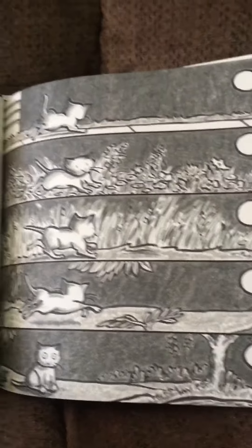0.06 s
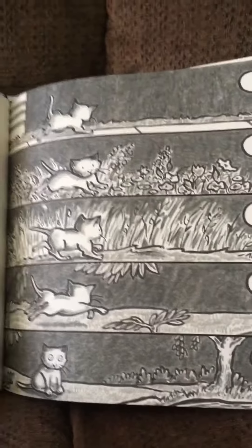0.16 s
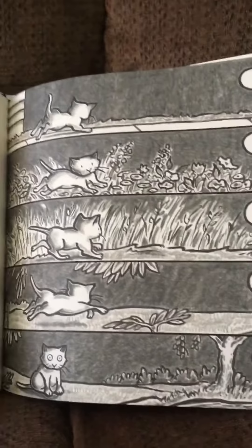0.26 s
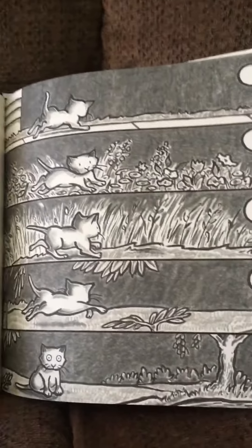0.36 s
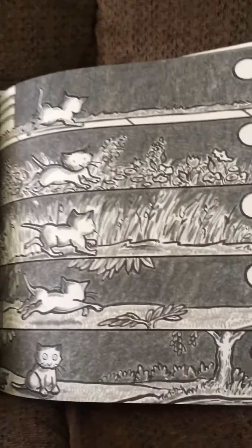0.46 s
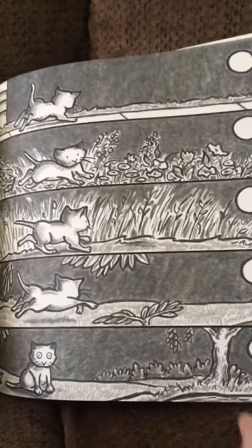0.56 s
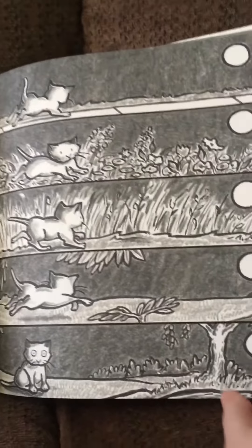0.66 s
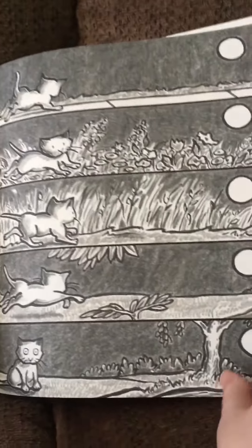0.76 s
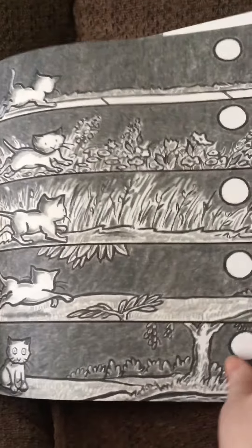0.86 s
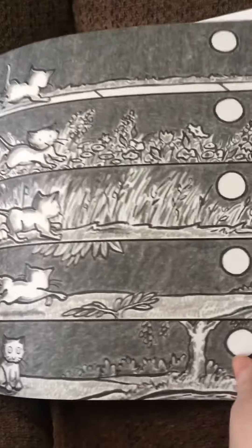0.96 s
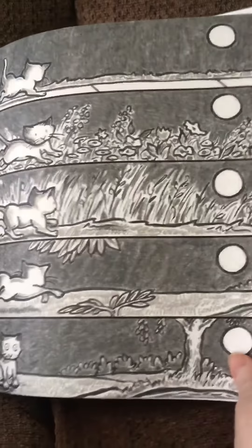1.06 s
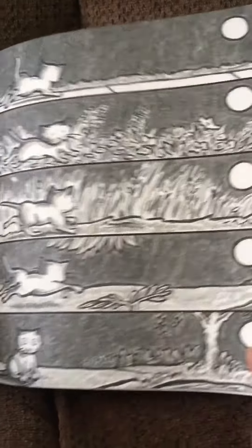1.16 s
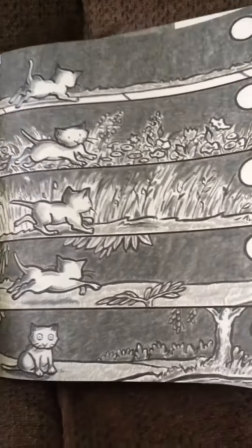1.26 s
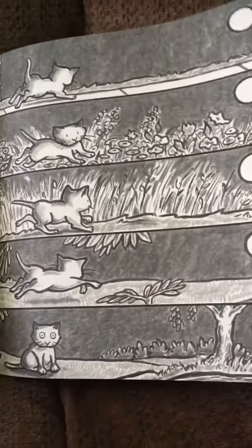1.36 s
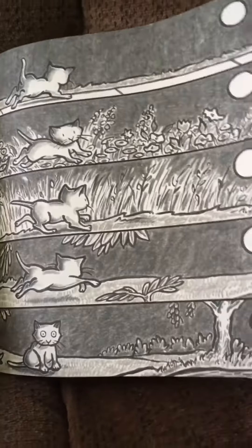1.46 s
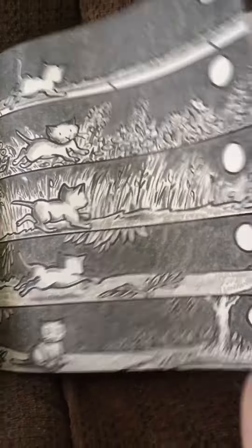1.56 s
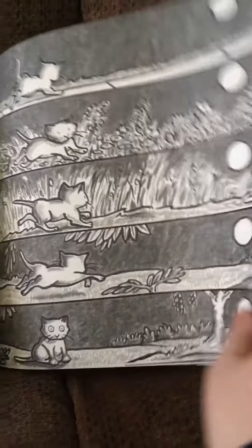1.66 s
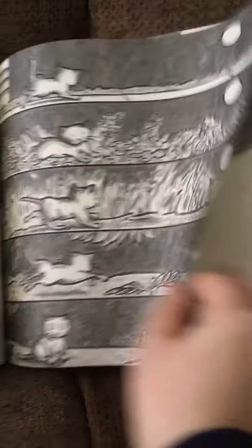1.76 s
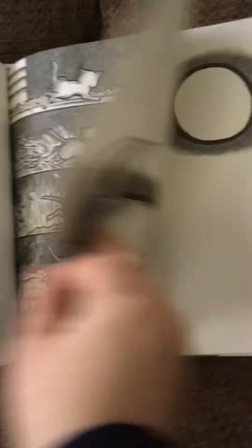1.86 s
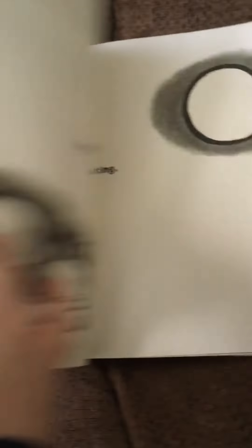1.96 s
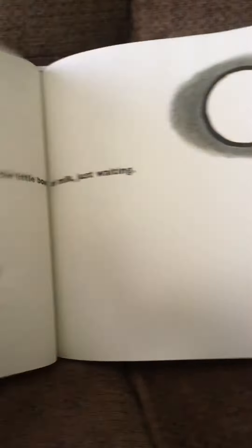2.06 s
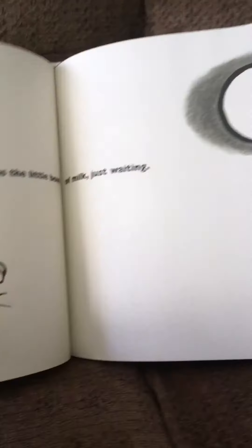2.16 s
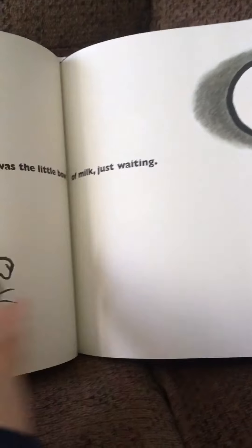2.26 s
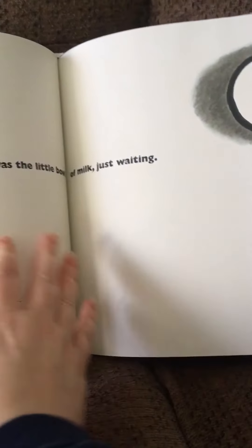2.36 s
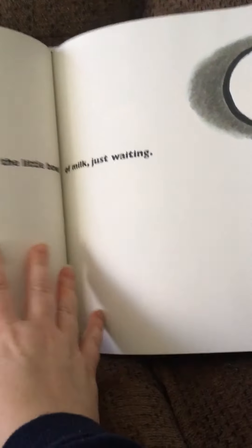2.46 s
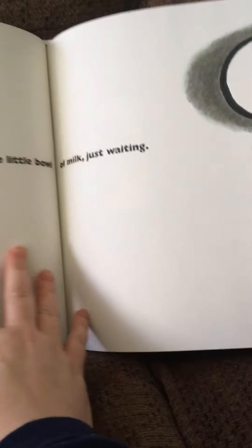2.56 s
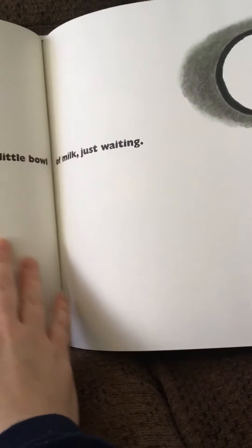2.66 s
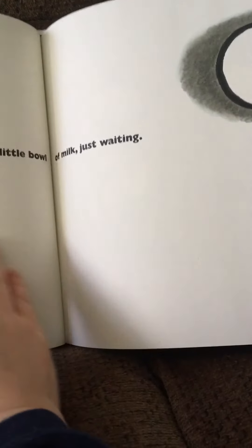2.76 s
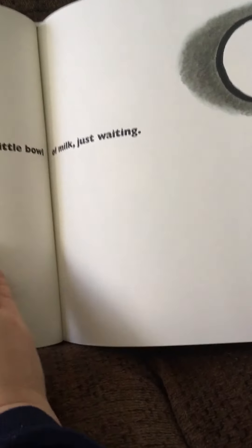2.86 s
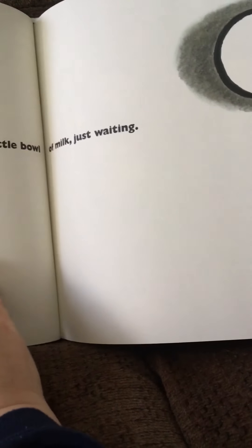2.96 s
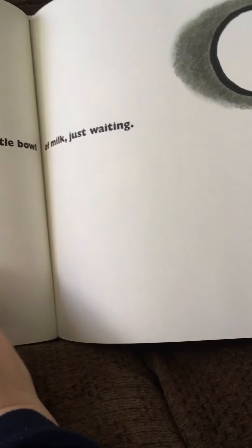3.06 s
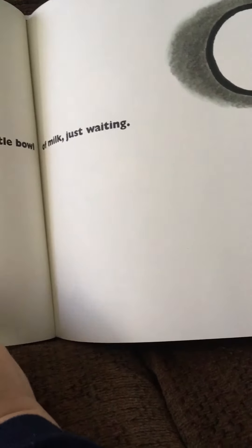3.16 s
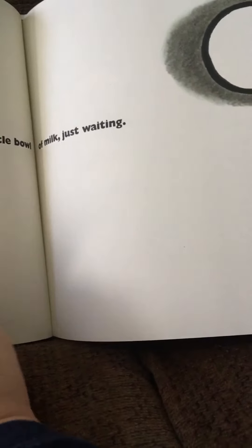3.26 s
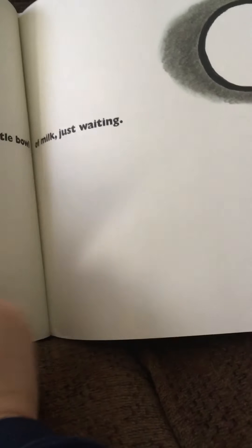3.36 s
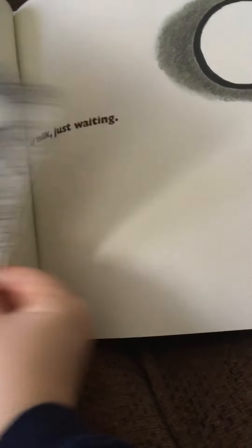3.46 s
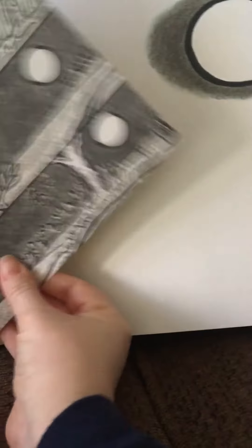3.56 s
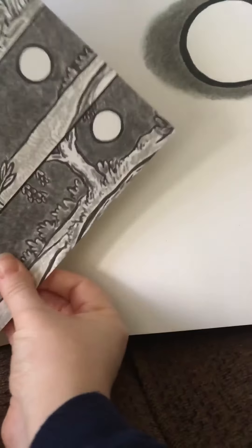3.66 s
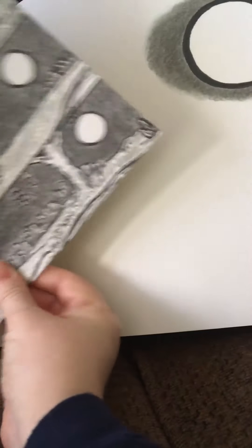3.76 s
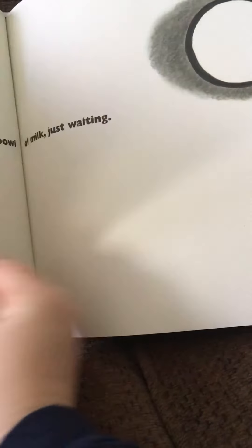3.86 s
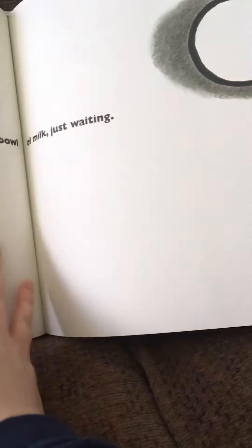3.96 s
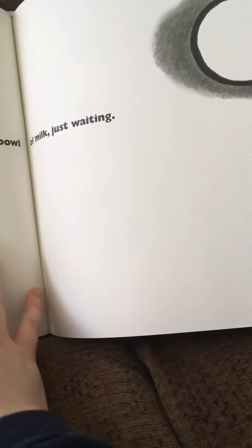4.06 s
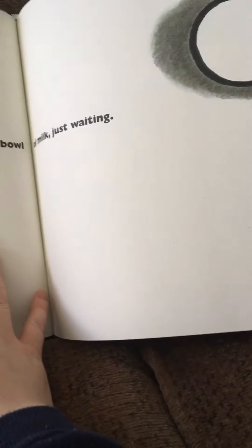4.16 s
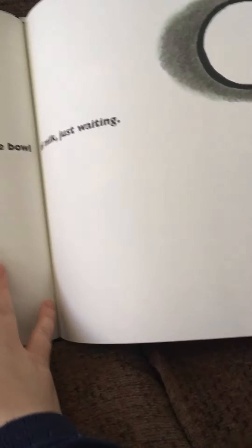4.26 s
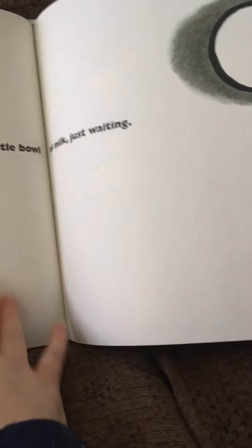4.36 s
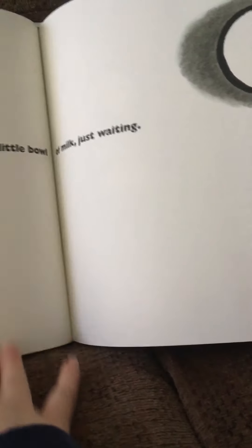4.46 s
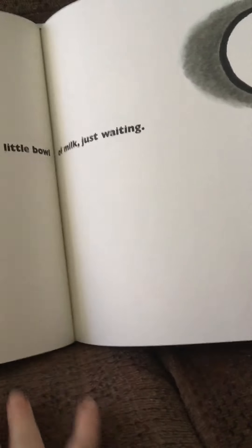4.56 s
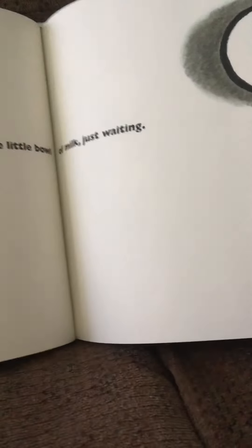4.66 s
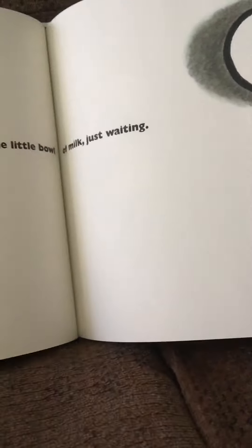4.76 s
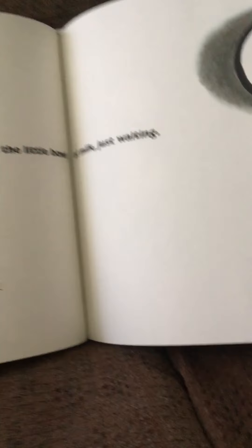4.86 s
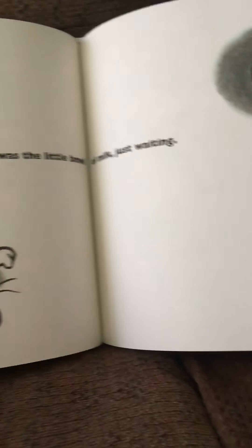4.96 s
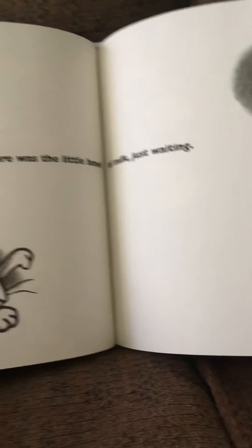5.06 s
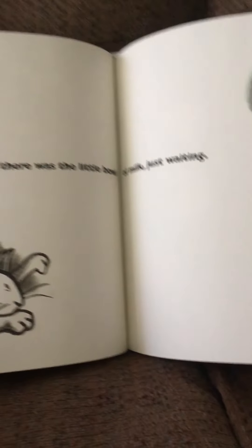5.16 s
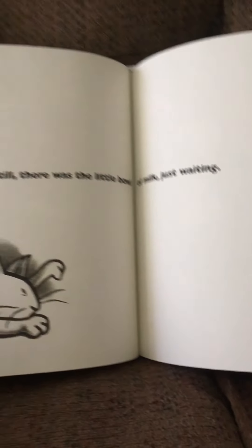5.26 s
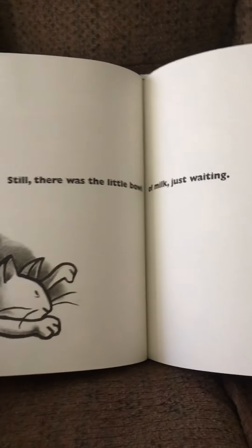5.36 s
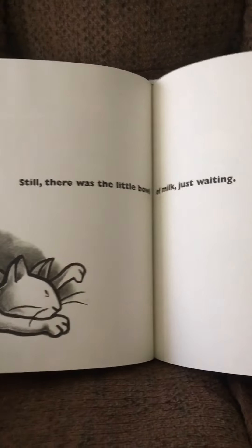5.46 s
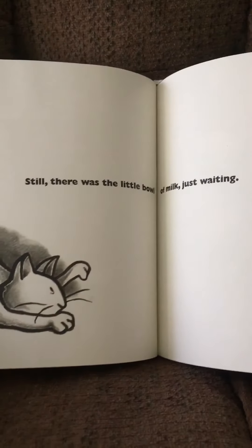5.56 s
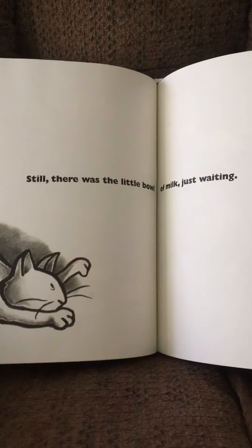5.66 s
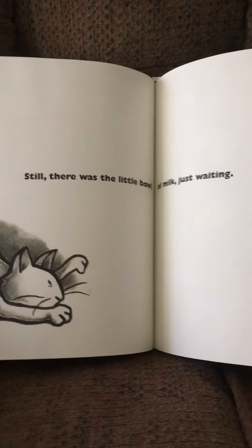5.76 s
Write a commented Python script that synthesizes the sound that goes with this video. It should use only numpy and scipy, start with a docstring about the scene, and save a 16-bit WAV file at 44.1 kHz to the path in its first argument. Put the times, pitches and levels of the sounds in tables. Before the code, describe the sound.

A stiff book page is turned by hand, with paper sliding, crackling and flapping close by in a quiet room.

```python
"""A hand turns a stiff page of a picture book on a sofa, close to a microphone in a quiet room.
From 0.4 s fingers slide over the paper, its fibres catching in a hiss and rasp. From 0.8 s the sheet
buckles in sharp snaps and its edge scrapes. Near 2.1 s it flaps over, thudding the book into the cushion.
After more strokes it is lifted again and crackles from 3.3 to 4 s; last, it is smoothed flat until 5.5 s."""
import sys
import numpy as np
from scipy import signal
from scipy.fft import rfft, irfft
from scipy.io import wavfile
from scipy.ndimage import uniform_filter1d

SR = 44100
rng = np.random.default_rng(int(sys.argv[2]) if len(sys.argv) > 2 else 0)


def store_pcm(level_fs):
    """Save levels as 16-bit WAV."""
    pcm = np.round(np.clip(level_fs, -1, 1) * 32767).astype(np.int16)
    wavfile.write(sys.argv[1], SR, np.atleast_2d(pcm).T)


N = 256509


def amp(db):
    """Decibels to gain."""
    return 10 ** (np.asarray(db) / 20)


def unit(x):
    """Scales to rms 1."""
    return x / np.sqrt(np.mean(x ** 2) + 1e-20)


def read(points, hz):
    """Interpolates a curve over log frequency."""
    f, value = np.transpose(points)
    return np.interp(np.log(hz + 1), np.log(f + 1), value)


def add(mix, start_s, sound):
    """Mixes a sound in at start_s."""
    part = mix[max(round(start_s * SR), 0):][:len(sound)]
    part += sound[:len(part)]


def colour(x, points, size=2048):
    """Minimum-phase filter from (f/Hz, level/dB) points; attacks stay sharp."""
    log_gain = np.log(amp(read(points, abs(np.fft.fftfreq(size, 1 / SR)))))
    taps = np.fft.ifft(np.exp(np.conj(signal.hilbert(log_gain)))).real[:size // 2]
    return signal.fftconvolve(x, taps)[:len(x)]


def narrow_noise(start_hz, end_hz, length_s, rel_width):
    """Noise through one gliding resonance."""
    centre_hz = np.geomspace(start_hz, end_hz, max(round(length_s * SR), 256))
    offset = 2 * np.fft.fftfreq(SR, 1 / SR) / (rel_width * centre_hz.mean())
    noise = rng.standard_normal(SR) + 1j * rng.standard_normal(SR)
    waver = np.fft.ifft(np.fft.fft(noise) / (1 + offset ** 2))
    return (waver[:len(centre_hz)] * np.exp(2j * np.pi * np.cumsum(centre_hz) / SR)).real


def burst(sound, length_s, rms_db, rise, fall):
    """Cuts a burst from a steady sound; rise and fall are shares of its length."""
    u = np.linspace(0, 1, int(np.clip(length_s * SR, 200, len(sound))))
    envelope = np.clip(np.minimum(u / rise, (1 - u) / fall), 0, 1)
    return amp(rms_db) * unit(sound[:len(u)] * envelope)


def friction(per_s, spread_db, smooth):
    """Fibres catch and let go: tiny uneven clicks over a smooth hiss."""
    sizes = amp(spread_db * np.minimum(rng.exponential(1, N), 5)) * rng.choice([-1, 1], N)
    clicks = unit(sizes * (rng.random(N) < per_s / SR))
    return unit(clicks + smooth * rng.standard_normal(N))


# background spectrum: f/Hz, relative level/dB
FLOOR_SPECTRUM = [(15, -53.5), (28, -26.5), (45, -1.5), (70, -4.5), (95, -13), (135, -20.5), (215, -18),
                  (280, -25), (400, -26.5), (520, -32.5), (1100, -35), (2200, -40), (5000, -44),
                  (15500, -38)]

def noise_floor(rms_db=-59.5):
    """Low room rumble and faint microphone hiss."""
    gain = amp(read(FLOOR_SPECTRUM, np.fft.rfftfreq(N, 1 / SR)))
    return amp(rms_db) * unit(irfft(rfft(rng.standard_normal(N)) * gain, N))


# near surfaces, open page first: delay/s, gain
REFLECTIONS = [(.0016, 0.11), (.0033, 0.057), (.0047, -0.059), (.0098, 0.16), (0.0122, -0.18),
               (0.0129, 0.036), (.0185, -0.016)]
# room decay: f/Hz, t60/s
ROOM_T60 = [(100, 0.34), (500, 0.37), (1500, 0.27), (5000, 0.22), (15000, 0.22)]

def room(x, wet_db):
    """Near reflections, then a short tail dulled by furniture."""
    near = x.copy()
    reflected = colour(x, [(1500, -5), (4000, -5), (14000, -10.5)])
    for delay_s, gain in REFLECTIONS:
        add(near, delay_s, gain * reflected)
    hz, t, noise = signal.stft(rng.standard_normal(SR // 2), SR, nperseg=256)
    tail = signal.istft(noise * amp(-60 * t / read(ROOM_T60, hz)[:, None]), SR, nperseg=256)[1]
    tail *= np.clip((np.arange(len(tail)) / SR - 0.005) / 0.015, 0, 1)
    tail = colour(tail / np.linalg.norm(tail), [(100, 4), (1500, -4.5), (4000, -6), (14000, -8.5)])
    return near + amp(wet_db) * signal.fftconvolve(x, tail)[:N]


# sheet sways: start t/s, end t/s, level/dB, f/Hz
SHEET_SWAYS = [(1.55, 1.72, -58.5, 100), (2.092, 2.17, -43.5, 84.8), (2.181, 2.74, -62.5, 354.3),
               (3.111, 3.21, -61.5, 348), (3.455, 3.68, -50, 90.8), (3.785, 4.02, -53.5, 87.9)]

def sways():
    """The bowed sheet wobbles in one low, loose mode and settles."""
    out = np.zeros(N)
    for start, end, db, hz in SHEET_SWAYS:
        mode = narrow_noise(hz, hz, end - start, rel_width=0.75)
        add(out, start, burst(mode, end - start, db, rise=0.084, fall=0.63))
    return out


def air_push(db, hz):
    """The broad sheet pushes air: a few low cycles that sag in pitch on the cushion."""
    t = np.arange(4096) / SR
    cycles = hz * np.cumsum(0.688 + 0.55 * np.exp(-t / 0.013)) / SR
    spectrum = [(30, -15), (hz / 2, 0), (hz * 1.6, -1), (hz * 2, -11), (hz * 5, -40), (4000, -75)]
    wobble = unit(colour(rng.standard_normal(len(t)), spectrum))
    envelope = (1 - np.exp(-t / 0.0036)) * np.exp(-t / 0.0098)
    return amp(db) * (np.sin(2 * np.pi * cycles) + 0.93 * wobble) * envelope


# cushion thuds: t/s, level/dB, nominal f/Hz
BOOK_BUMPS = [(0.524, -38, 80), (0.657, -41.5, 156), (.782, -36, 199), (1.296, -46, 171), (1.511, -36, 297),
              (1.554, -37, 109), (1.974, -40.5, 205), (2.097, -31.5, 201), (2.143, -28.5, 201),
              (3.327, -30.5, 231), (3.561, -35, 163), (3.774, -38, 179), (3.804, -36, 151),
              (3.954, -34.5, 162), (4.038, -46.5, 155), (4.073, -45, 148), (4.206, -51, 141)]

def bumps():
    """Hand and falling page press the book into the cushion with soft thuds."""
    out = np.zeros(N)
    for start, db, hz in BOOK_BUMPS:
        add(out, start, air_push(db, hz))
    return out


# fingertip or page edge skating: start t/s, end t/s, level/dB, start f/Hz, end f/Hz
CONTACT_SWISHES = [(0.875, .937, -60, 4400, 4400), (0.961, 1.017, -64, 4710, 4700),
                   (1.203, 1.5, -55, 4120, 3460), (1.225, 1.31, -51.5, 8750, 4970),
                   (1.818, 1.888, -59.5, 4070, 4140), (2.273, 2.375, -58, 4380, 4200),
                   (2.406, 2.457, -56, 4420, 4410), (2.65, 2.805, -66, 3910, 3900)]

def swishes():
    """Friction excites a bright contact resonance, which sinks where the gap under the page opens."""
    out = np.zeros(N)
    for start, end, db, start_hz, end_hz in CONTACT_SWISHES:
        resonance = narrow_noise(start_hz, end_hz, end - start, rel_width=0.13)
        add(out, start, burst(resonance, end - start, db, rise=0.03, fall=0.56))
    return out


# edge friction: f/Hz, relative level/dB
SCRAPE_SPECTRUM = [(200, -1), (900, -8.5), (2000, 1), (4000, 2.5), (6500, 0.5), (10000, 2), (16000, -5)]
# edge drags over the next page: start t/s, end t/s, level/dB
EDGE_SCRAPES = [(0.984, 1.013, -51), (1.296, 1.313, -40), (1.38, 1.392, -45), (1.85, 1.868, -51.5),
                (2.077, 2.143, -46), (2.201, 2.235, -40.5), (3.608, 3.656, -48), (3.898, 3.912, -42.5),
                (3.94, 3.96, -37.5)]

def scrapes():
    """The cut edge skids in bright, grainy bursts that stop short as it slips free."""
    out = np.zeros(N)
    grain = colour(friction(per_s=5000, spread_db=2.5, smooth=1), SCRAPE_SPECTRUM)
    for start, end, db in EDGE_SCRAPES:
        add(out, start, burst(grain[round(start * SR):], end - start, db, rise=0.17, fall=0.049))
    return out


# flutter spectrum: f/centre, relative level/dB
FLAP_SPECTRUM = [(.1, -21.5), (.35, -13.5), (.6, -6.5), (.8, -7), (1.12, -1), (1.45, -13.5), (2.1, -20),
                 (4, -47), (12, -36)]
# loose sheet flexing: start t/s, end t/s, level/dB, centre f/Hz
SHEET_FLAPS = [(0.782, 0.806, -47, 670), (0.818, .827, -44, 690), (0.982, 1.023, -53, 790),
               (1.294, 1.315, -50, 610), (1.568, 1.578, -46.5, 1550), (2.006, 2.038, -55.5, 1080),
               (2.083, 2.117, -31, 1300), (2.142, 2.17, -38, 960), (2.16, 2.212, -39, 1230),
               (3.87, 3.928, -39.5, 1270), (3.95, 3.985, -45, 1040), (4.205, 4.227, -63, 636)]

def flaps():
    """A run of soft buckles in the flexing sheet gives a hollow flutter."""
    out = np.zeros(N)
    buckles = friction(per_s=2500, spread_db=0.9, smooth=0.81)
    for start, end, db, hz in SHEET_FLAPS:
        spectrum = [(ratio * hz, level) for ratio, level in FLAP_SPECTRUM]
        flutter = colour(buckles[round(start * SR):][:SR // 4], spectrum)
        add(out, start, burst(flutter, end - start, db, rise=0.12, fall=0.56))
    return out


def bending(x, depth_db, patch_hz, patch_s, size=512):
    """The bending sheet favours shifting bands from moment to moment."""
    frames = dict(nperseg=size, noverlap=size * 3 // 4)
    bands = signal.stft(x, **frames)[2]
    patch_bins = max(round(patch_hz * size / SR), 1)
    patch_frames = max(round(patch_s * SR * bands.shape[1] / len(x)), 1)
    field = uniform_filter1d(rng.standard_normal(bands.shape), patch_bins, axis=0)
    field = unit(uniform_filter1d(field, patch_frames, axis=1))
    return signal.istft(bands * amp(depth_db * field), **frames)[1][:len(x)]


def hand_speed(start, fastest, end):
    """A stroke speeds up and slows to rest in one smooth arch."""
    progress = np.interp(np.arange(N) / SR, [start, fastest, end], [0, 0.5, 1])
    return np.maximum(np.sin(np.pi * progress), 0)


# light touch: f/Hz, relative level/dB
HISS_SPECTRUM = [(300, -20), (1500, -29.5), (4000, -19), (6500, -1.5), (9000, 0), (13000, 3.5),
                 (16000, -0.5)]
# firm contact: f/Hz, relative level/dB
RASP_SPECTRUM = [(100, -24), (300, -17.5), (520, -20), (750, -8), (1000, -1.5), (1600, -0.5), (2600, -3.5),
                 (4200, -3.5), (6500, -7.5), (10000, -8.5), (16000, -25)]
# palm: f/Hz, relative level/dB
RUB_SPECTRUM = [(80, -7.5), (230, 2.5), (520, -7), (800, 1.5), (1200, -7.5), (2200, -20.5), (6000, -23.5)]
# hand and page over paper: start t/s, fastest t/s, end t/s, hiss level/dB, rasp level/dB
HAND_STROKES = [(.36, .57, 0.64, -58.5, -66.5), (0.601, .75, .83, -57.5, -57.5),
                (0.756, .86, .96, -54.5, -52), (0.94, .975, 1.06, -66, -62.5),
                (1.0, 1.175, 1.24, -63.5, -72.5), (1.148, 1.323, 1.47, -49, -45.5),
                (1.296, 1.49, 1.677, -53.5, -46.5), (1.594, 1.647, 1.78, -50.5, -51.5),
                (1.646, 1.82, 2.09, -53, -57), (2.06, 2.115, 2.204, -40.5, -43.5),
                (2.252, 2.305, 2.4, -58, -52.5), (2.379, 2.49, 2.676, -50, -52),
                (2.626, 2.69, 2.89, -47, -59), (2.843, 2.92, 3.005, -53, -59),
                (3.001, 3.045, 3.25, -50.5, -55), (3.085, 3.155, 3.287, -44, -42.5),
                (3.256, 3.33, 3.715, -56, -50), (3.703, 3.865, 3.91, -43.5, -46.5),
                (3.86, 3.99, 4.07, -55, -54), (4.03, 4.12, 4.22, -65, -60),
                (4.193, 4.233, 4.34, -58.5, -63), (4.202, 4.402, 4.59, -49.5, -57.5),
                (4.376, 4.593, 4.99, -53.5, -59.5), (4.86, 4.99, 5.11, -56.5, -65.5),
                (5.127, 5.215, 5.5, -66, -72)]

def sliding(speed_exponent=1.07, grip_depth_db=0.94, rub_re_rasp_db=-2.5, rub_limit_db=-64.5):
    """Friction grows with speed: a light touch hisses, firm contact rasps, the palm rubs dully."""
    hiss_power, rasp_power = np.zeros(N), np.zeros(N)
    for start, fastest, end, hiss_db, rasp_db in HAND_STROKES:
        drive = hand_speed(start, fastest, end) ** speed_exponent
        hiss_power += (drive * amp(hiss_db)) ** 2
        rasp_power += (drive * amp(rasp_db)) ** 2
    hiss_gain, rasp_gain = np.sqrt(hiss_power), np.sqrt(rasp_power)
    hiss = colour(friction(per_s=6000, spread_db=2.6, smooth=1), HISS_SPECTRUM)
    hiss = unit(bending(hiss, depth_db=2.0, patch_hz=652, patch_s=0.026))
    rasp = colour(friction(per_s=3500, spread_db=3.0, smooth=0.96), RASP_SPECTRUM)
    rasp = unit(bending(rasp, depth_db=2.5, patch_hz=450, patch_s=0.031))
    rub = unit(colour(rng.standard_normal(N), RUB_SPECTRUM))
    rub_gain = np.minimum(rasp_gain * amp(rub_re_rasp_db), amp(rub_limit_db))  # limit: hand lies flat
    # uneven skin grip: hiss and rasp flicker together
    grip = unit(uniform_filter1d(uniform_filter1d(rng.standard_normal(N), size=300), size=200))
    return (hiss * hiss_gain + rasp * rasp_gain) * amp(grip_depth_db * grip) + rub * rub_gain


# modes of a buckled patch: f/pitch, relative level/dB, t60/s
PATCH_MODES = [(0.602, -10, 0.025), (.9, 0, 0.013), (1.12, 5.5, 0.0074), (1.38, -6.5, 0.0092),
               (1.9, -22, 0.014)]
# kink giving way: f/Hz, relative level/dB
TICK_SPECTRUM = [(300, -24), (2000, 1.5), (6000, 3), (13000, -4.5), (16000, 0.5)]
# kink running across the sheet: f/Hz, relative level/dB
CRACK_SPECTRUM = [(200, -5.5), (450, -15.5), (900, -0.5), (2000, 4.5), (3700, -3), (6000, -7.5), (8500, -8),
                  (13000, -4), (16000, -12.5)]
# buckles: t/s, ring level/dB, crack level/dB, patch pitch f/Hz, ping level/dB, ping f/Hz
BUCKLE_SNAPS = [(0.785, -36, -34.5, 1430, -41, 2140), (.806, -52, -42, 870, -52, 2380),
                (0.8131, -40, -34.5, 1130, -40.5, 2380), (0.8484, -60, -41, 1540, -53, 5940),
                (0.8624, -40.5, -64, 720, -46, 2430), (0.9902, -48.5, -43, 1100, -45, 4630),
                (0.9956, -58, -39.5, 1110, -47, 4520), (1.1479, -78, -49, 1450, -64, 6400),
                (1.511, -33.5, -33, 1405, -33.5, 2620), (1.67, -43.5, -49, 1270, -58, 2890),
                (2.076, -49, -40, 1230, -40.5, 6800), (2.0896, -30, -37, 1026, -38, 2260),
                (2.139, -49, -31.5, 1200, -37, 8800), (2.144, -40, -40, 1050, -42, 5900),
                (2.154, -32, -51, 1140, -41.5, 6330), (2.1805, -35.5, -46, 1220, -60, 2470),
                (2.3934, -50, -53, 1150, -57, 3500), (3.2968, -27.5, -35, 1070, -43, 5600),
                (3.3285, -24.5, -28.5, 1080, -30.5, 3580), (3.3622, -23, -29, 1175, -32.5, 3440),
                (3.4588, -20.5, -29.5, 1185, -47.5, 2050), (3.4861, -27, -34, 1056, -42.5, 5670),
                (3.5634, -24, -32.5, 1165, -37.5, 5900), (3.5965, -30, -37.5, 980, -42, 6850),
                (3.7058, -30.5, -65, 840, -42.5, 2280), (3.7772, -38, -44.5, 980, -55, 6100),
                (3.7925, -33.5, -44, 930, -43, 9800), (3.8015, -37, -39.5, 1210, -45, 6000),
                (3.896, -40, -42, 1300, -43, 3020), (3.9361, -41, -36.5, 1700, -44, 5000),
                (3.941, -45, -38, 1700, -42, 5140)]

def snaps(tick_re_crack_db=-1, attack_s=0.005):
    """Each buckle ticks, cracks with a short fizz, rings its patch, pings the crease and pushes air."""
    out, t = np.zeros(N), np.arange(2048) / SR
    crack_envelope = (np.exp(-t / 0.001) + 0.21 * np.exp(-(t / 0.0078) ** 2)) * (1 - np.exp(-t / 0.00045))
    for start, ring_db, crack_db, pitch_hz, ping_db, ping_hz in BUCKLE_SNAPS:
        detunes = 1 + 0.045 * rng.standard_normal(len(PATCH_MODES))
        ring = sum(amp(db - 60 * t / t60) * np.sin(2 * np.pi * pitch_hz * ratio * detune * t)
                   for (ratio, db, t60), detune in zip(PATCH_MODES, detunes))
        ring *= 1 - np.exp(-t / 0.0006)
        ping = np.sin(2 * np.pi * ping_hz * t) * (np.exp(-t / 0.0017) - np.exp(-t / 0.00061))
        tick = colour(rng.standard_normal(len(t)) * np.exp(-t / 0.0006), TICK_SPECTRUM)
        crack = colour(rng.standard_normal(len(t)) * crack_envelope, CRACK_SPECTRUM)
        tick_db = crack_db + tick_re_crack_db
        for part, db in (ring, ring_db), (tick, tick_db), (crack, crack_db), (ping, ping_db):
            attack_rms = np.sqrt(np.sum(part ** 2) / round(attack_s * SR))  # all energy over attack_s
            add(out, start, amp(db) * part / attack_rms)
        add(out, start, air_push(db=-29 + 0.5 * ring_db, hz=180))
    return out


def scene():
    """Paper sounds from one close spot over the room's noise, alike in both channels."""
    paper = sliding() + swishes() + snaps() + scrapes() + flaps() + bumps() + sways()
    mono = room(paper, wet_db=-12.5) + noise_floor()
    return np.array([mono, mono])


# colour of the microphone in its case: f/Hz, width/Hz, level/dB
MIC_RIPPLE = [(3410, 350, 1), (4920, 110, -5.5), (6000, 560, 1.5), (7760, 550, -3), (9070, 420, 0),
              (10400, 500, -3.5)]

def record(dry):
    """The microphone drops the deepest bass and ripples the treble; then the band limit."""
    low_hz, high_hz = 36, 15850
    hz = np.fft.rfftfreq(N, 1 / SR)
    ripple_db = sum(db * np.exp(-((hz - centre) / width) ** 2) for centre, width, db in MIC_RIPPLE)
    bass_cut = 1 / np.sqrt(1 + (low_hz / (hz + 1)) ** 8)
    heard = irfft(rfft(dry) * amp(ripple_db) * bass_cut, N)
    low_pass = signal.firwin(511, high_hz, window=("kaiser", 9), fs=SR)
    return signal.oaconvolve(heard, low_pass[None], "same", axes=1)


dry = scene()
out = record(dry)
store_pcm(out)
```